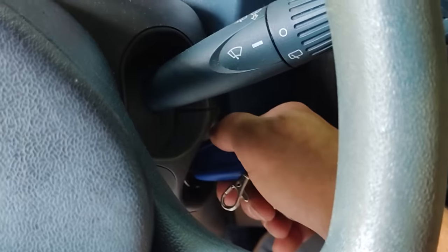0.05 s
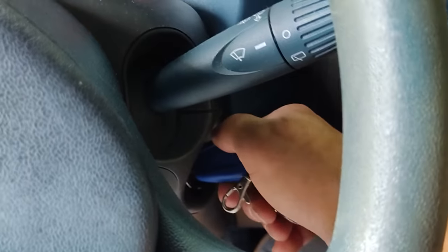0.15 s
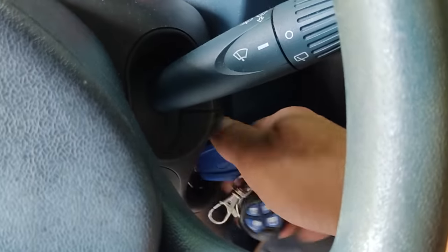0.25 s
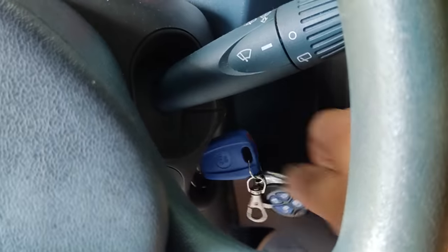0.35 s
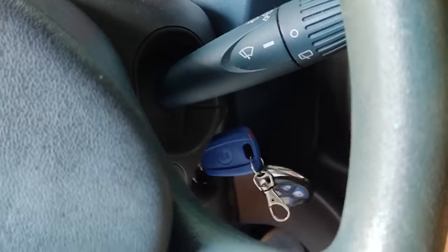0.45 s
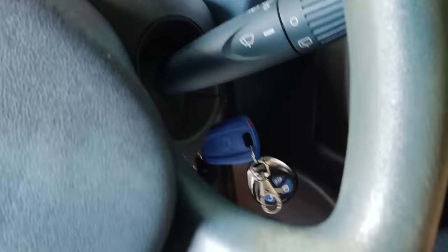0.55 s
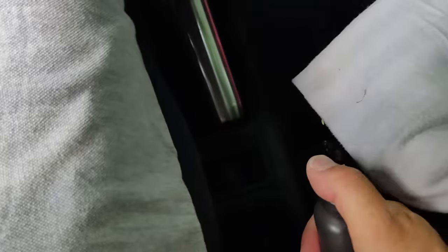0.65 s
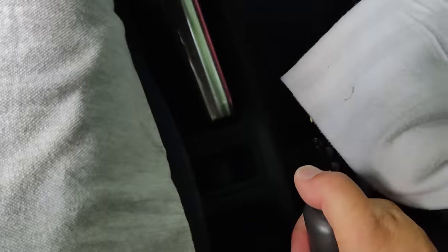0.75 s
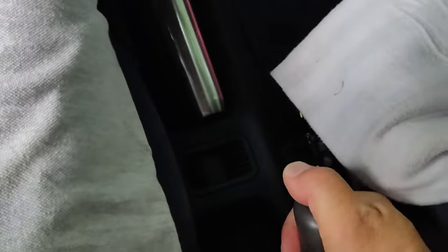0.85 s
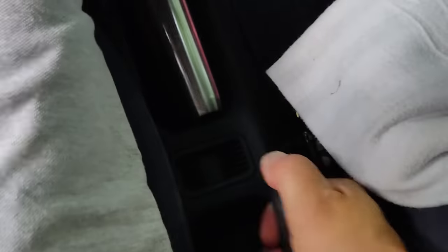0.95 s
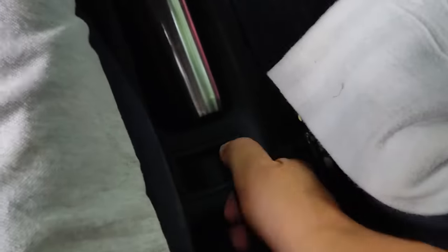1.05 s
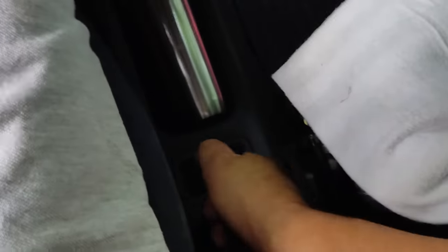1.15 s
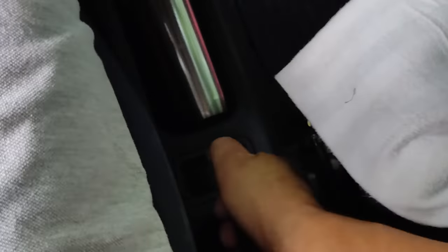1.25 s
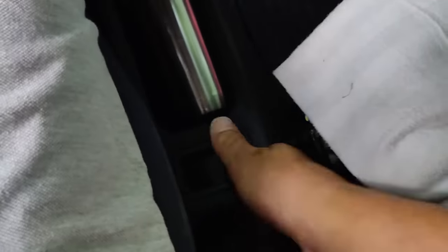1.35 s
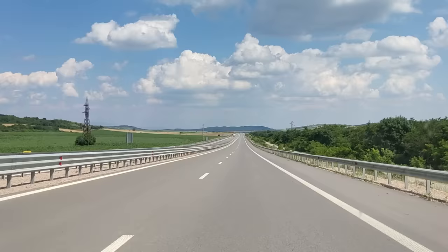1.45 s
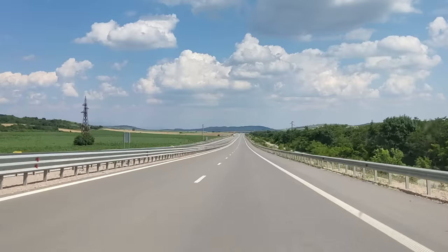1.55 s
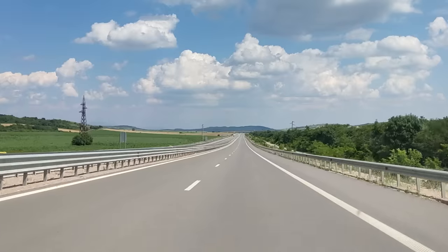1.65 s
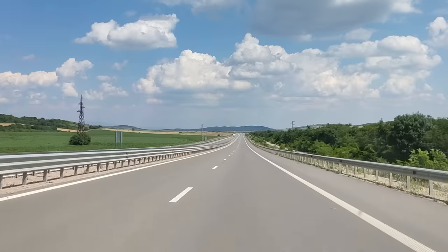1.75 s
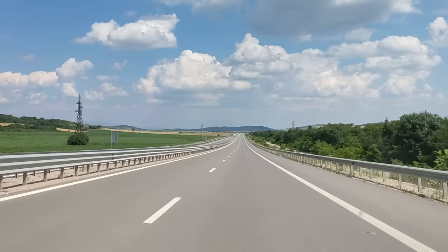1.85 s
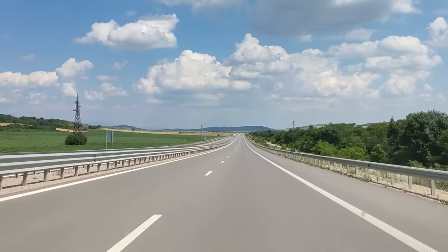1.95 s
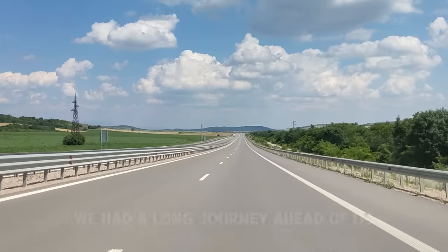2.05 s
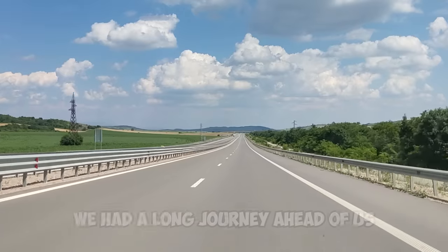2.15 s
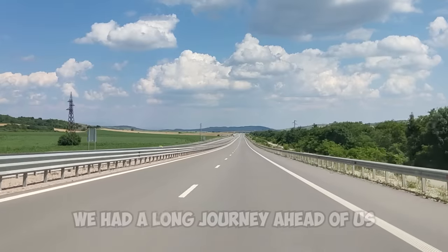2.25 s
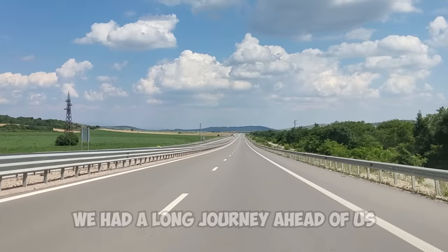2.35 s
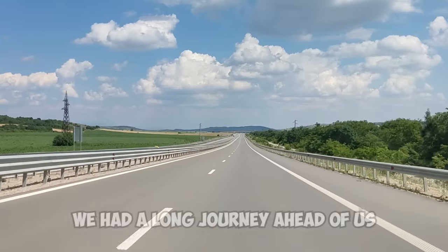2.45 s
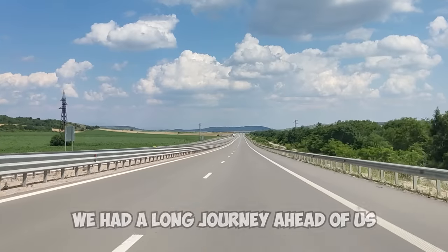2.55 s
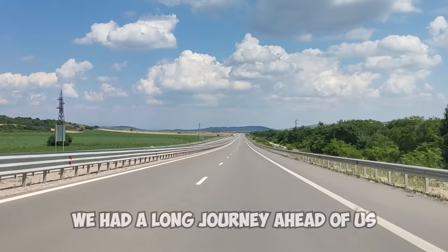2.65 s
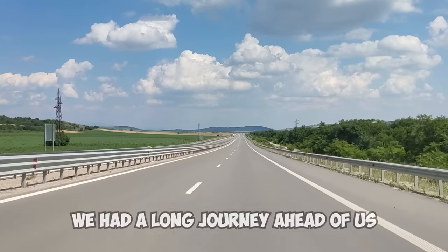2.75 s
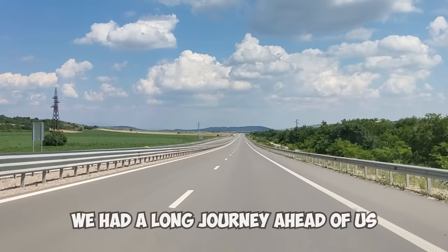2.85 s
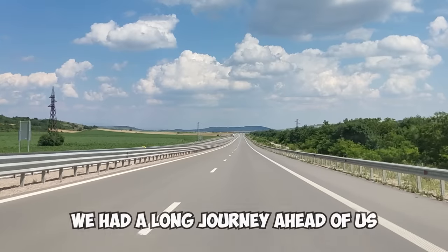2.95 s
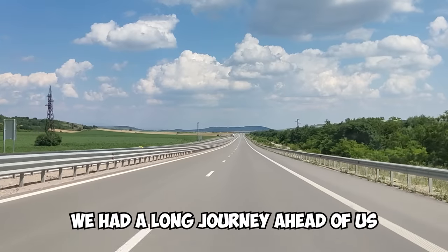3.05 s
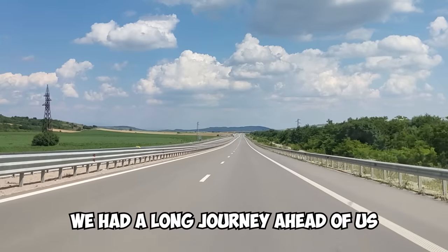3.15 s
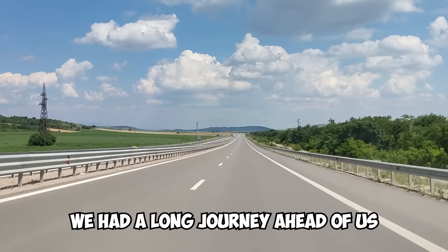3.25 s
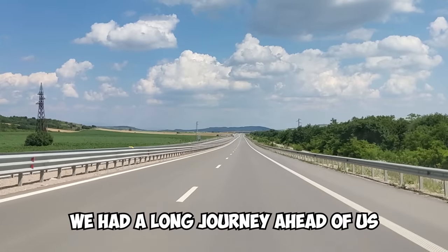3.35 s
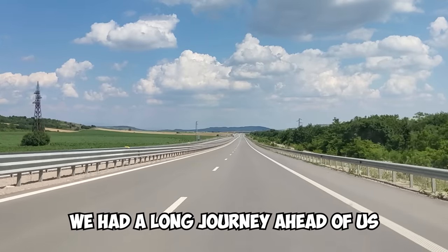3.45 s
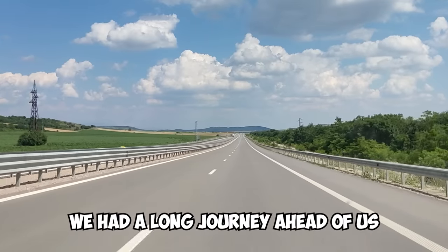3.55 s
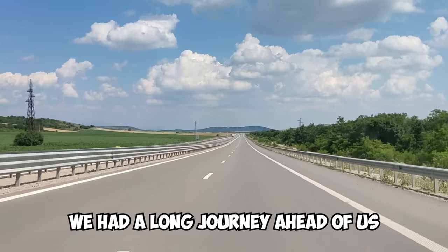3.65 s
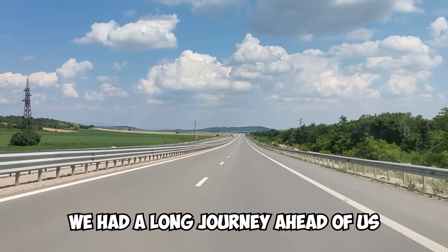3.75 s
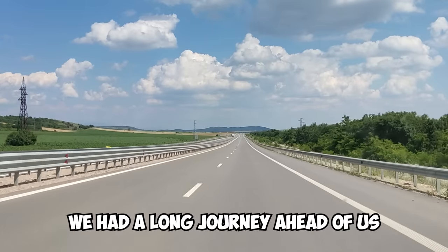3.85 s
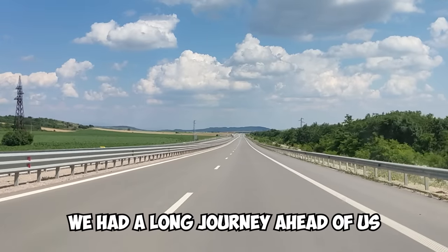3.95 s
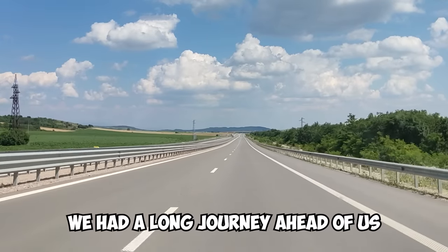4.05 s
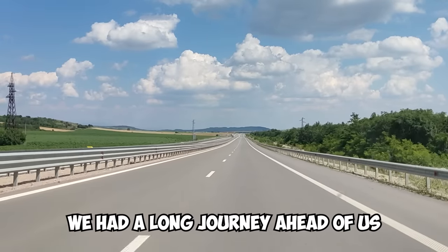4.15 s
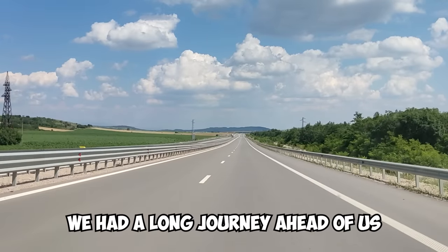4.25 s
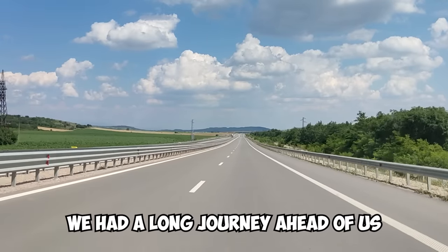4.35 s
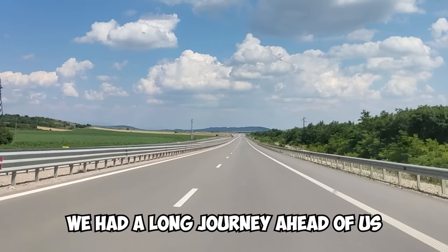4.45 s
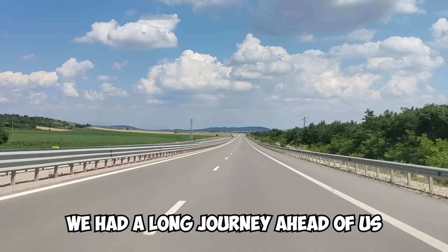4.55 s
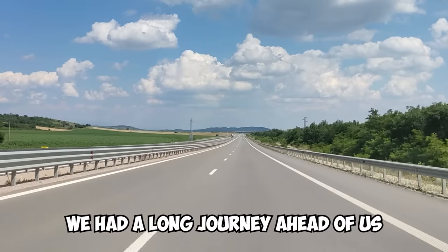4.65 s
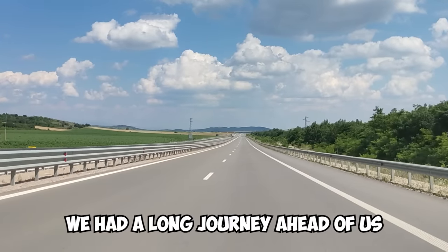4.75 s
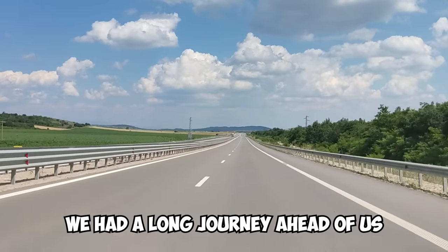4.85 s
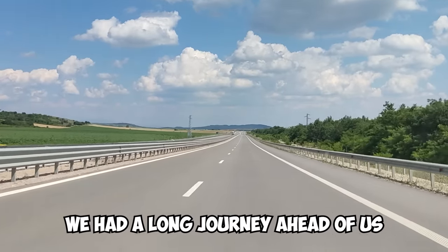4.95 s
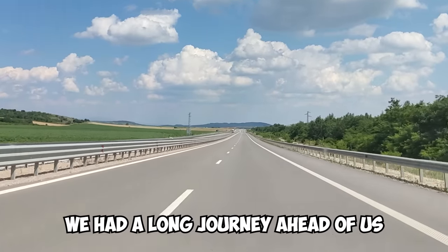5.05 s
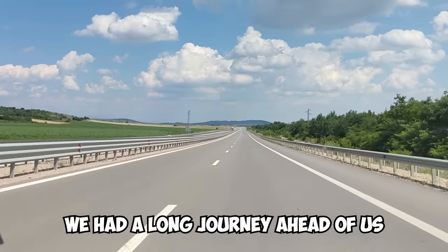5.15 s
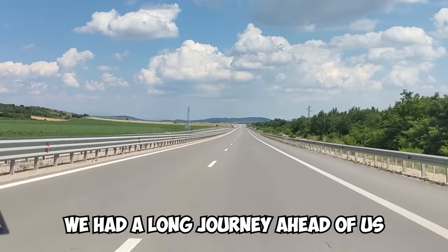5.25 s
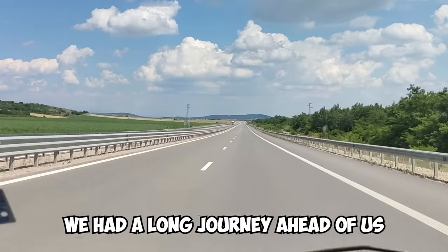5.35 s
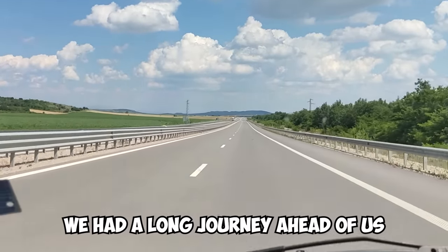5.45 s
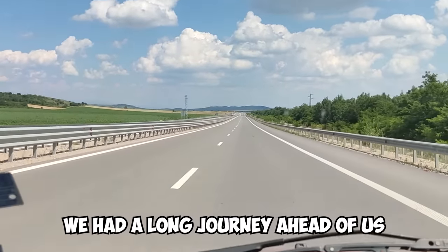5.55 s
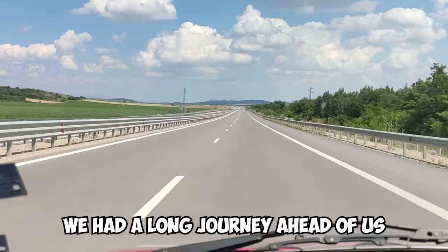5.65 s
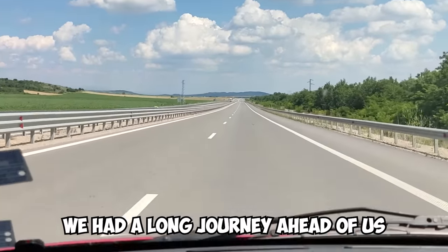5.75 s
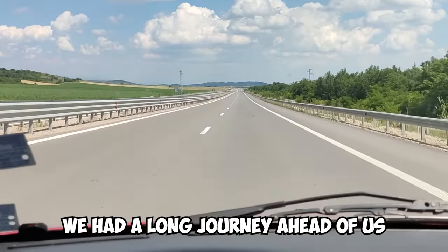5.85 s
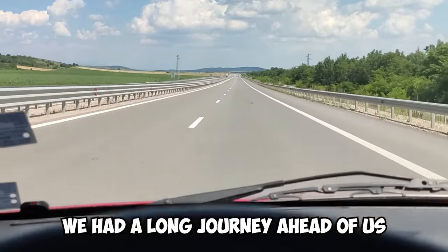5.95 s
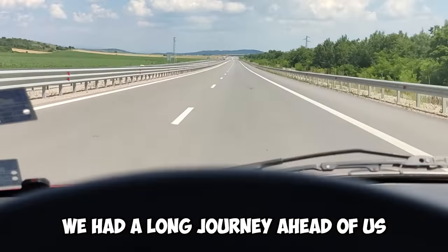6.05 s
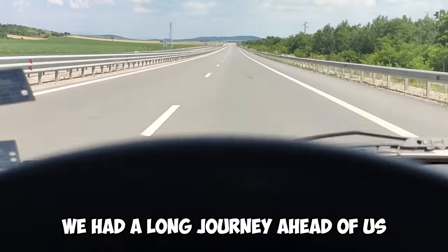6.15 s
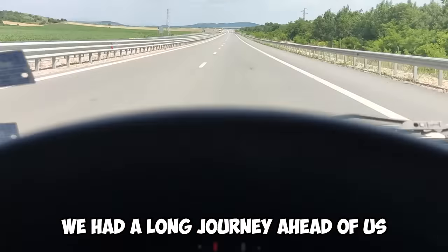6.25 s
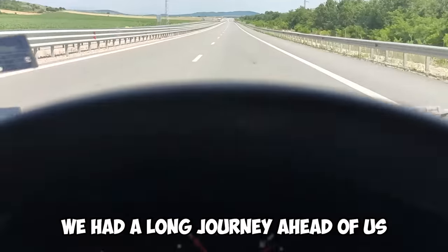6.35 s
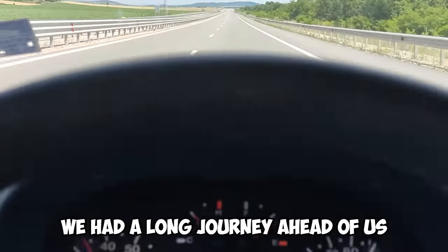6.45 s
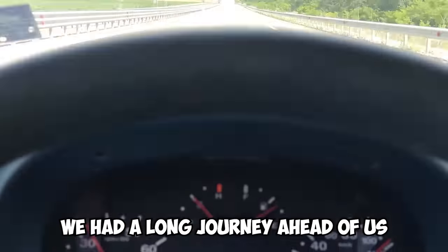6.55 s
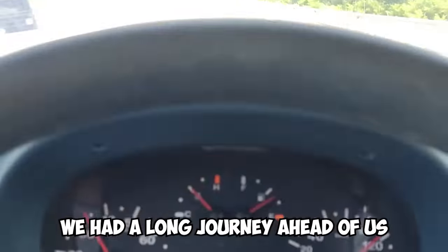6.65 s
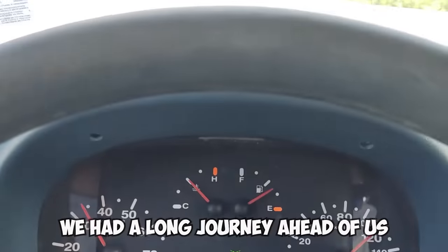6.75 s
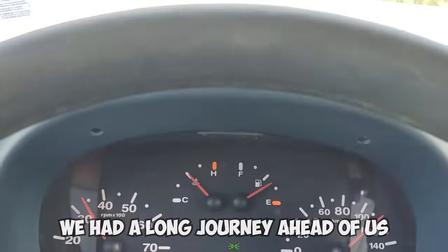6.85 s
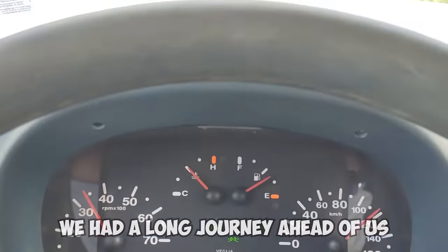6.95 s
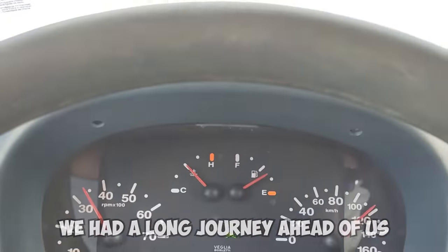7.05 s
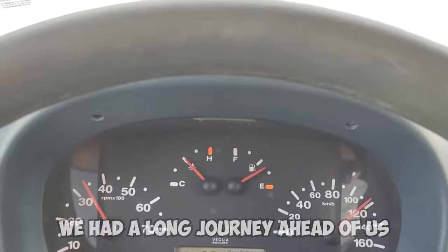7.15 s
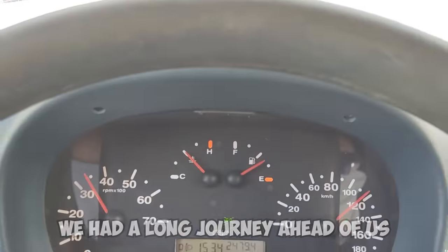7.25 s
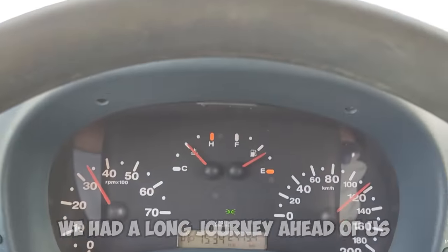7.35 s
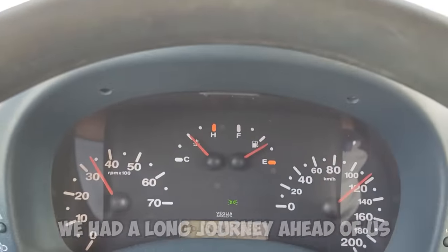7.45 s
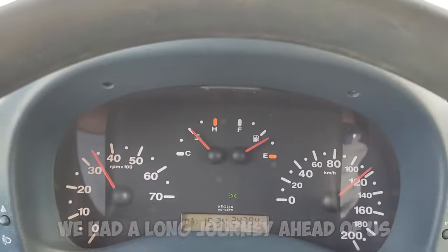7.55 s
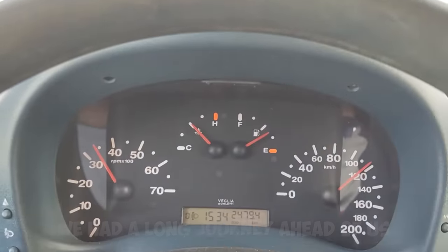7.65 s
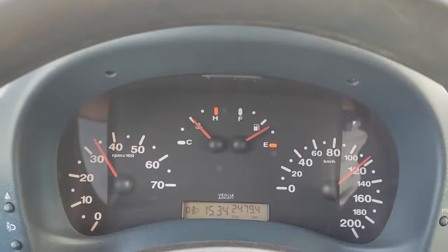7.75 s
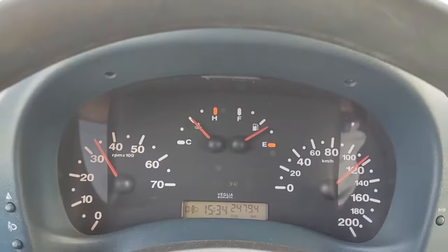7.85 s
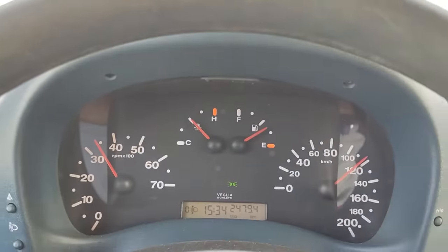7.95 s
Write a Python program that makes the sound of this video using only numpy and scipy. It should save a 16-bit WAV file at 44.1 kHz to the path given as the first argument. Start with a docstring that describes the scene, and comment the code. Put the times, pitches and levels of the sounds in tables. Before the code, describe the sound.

Car keys jingle in the ignition, a seat belt clicks shut over the idling engine, then steady motorway drone and tyre roar inside the cabin.

```python
"""A hand rumbles and rubs as it turns a small petrol car's ignition key; the key ring jingles in the
free vibration of struck steel. Next the engine idles, a periodic train of thumps and ticks, while a
seat-belt tongue latches and excites the modes of its hollow buckle. Then motorway cruising fades in:
the drone of the engine's orders, tyre roar transmitted through the body, and a thin whistle of
turbulent air at a seal."""
import sys
import numpy as np
from scipy import signal
from scipy.fft import rfft, irfft, next_fast_len
from scipy.io import wavfile

SR = 44100
rng = np.random.default_rng(int(sys.argv[2]) if len(sys.argv) > 2 else 0)


def put_to_file(sound):
    """Save the sound as 16-bit audio at rate SR, in the file named by the first command-line argument."""
    columns = np.atleast_2d(sound).T  # one column per channel
    safe = np.clip(columns, -1, 1)
    whole_steps = np.round(safe * 32767)
    wavfile.write(sys.argv[1], SR, whole_steps.astype(np.int16))


N = 352359
TIME = np.arange(N) / SR
RING_TIME = TIME[:SR // 3]  # time since a blow [s]
IDLE_START_S, CRUISE_START_S = 0.605, 1.501


def undb(db):
    """Amplitude ratio of a level in decibels."""
    return 10 ** (np.asarray(db) / 20)


def unit(x):
    """Normalisation to rms 1."""
    return x / np.sqrt(np.mean(x ** 2))


def curves(table):
    """Linear interpolation of each column over time."""
    times, *columns = np.transpose(table)
    return [np.interp(TIME, times, column) for column in columns]


def across(table, size, column=1):
    """Interpolation of one column over log frequency, on the bins of an FFT."""
    table = np.array(table)
    return np.interp(np.log(np.fft.rfftfreq(size, 1 / SR) + 1), np.log(table[:, 0]), table[:, column])


def walk(rate_hz):
    """Smooth random modulation with standard deviation near 1."""
    points = rng.standard_normal(int(TIME[-1] * rate_hz) + 2)
    return 1.2 * np.interp(TIME * rate_hz, np.arange(len(points)), points)


def attack(time_constant_s):
    """Exponential build-up after a blow."""
    return 1 - np.exp(-RING_TIME / time_constant_s)


def decay(t60):
    """Exponential damping: 60 dB in t60 seconds."""
    return np.exp(-np.log(1000) * RING_TIME / t60)


def ramp(start_s, length_s):
    """Linear rise from 0 to 1."""
    return np.clip((TIME - start_s) / length_s, 0, 1)


def swell(peak_s, rise_s, fall_s):
    """Exponential envelope of a movement: up 20 dB in rise_s, then down 20 dB in fall_s."""
    age = TIME - peak_s
    return undb(-20 * np.maximum(-age / rise_s, age / fall_s))


def movements(table):
    """Sum of the envelopes of several movements."""
    return sum(undb(db) * swell(s, rise_s, fall_s) for s, db, rise_s, fall_s in table)


def pan(db):
    """Channel gains for a level difference, left minus right."""
    return undb(np.array([[db], [-db]]) / 2)


def add(out, start_s, sound):
    """Superposition of a sound at a given time."""
    i = int(start_s * SR)
    out[:, i:i + sound.shape[1]] += sound


def ringing(modes, channels, detune, phase_scatter=1):
    """Free vibration: a sum of damped modes, randomly detuned at each blow."""
    out = 0
    for hz, db, t60 in modes:
        cycles = hz * (1 + detune * rng.standard_normal()) * RING_TIME
        offset = phase_scatter * rng.random((channels, 1))
        out = out + undb(db) * decay(t60) * np.sin(2 * np.pi * (cycles + offset))
    return out


# Likeness of left and right in the cabin: (frequency [Hz], correlation [-1 to 1])
CABIN_CORRELATION = [(60, 1), (180, 0.83), (235, 0.46), (300, 0.79), (400, 0.68), (630, 0.33), (820, 0.37),
                     (960, -0.22), (1450, -0.27), (2200, 0.077), (3200, -0.057), (6000, -0.026)]


def cabin_noise(spectrum, size=N):
    """Diffuse field of rms 1: long waves are correlated on the two sides, short waves are not."""
    padded = 2 * next_fast_len(size // 2 + 1)
    mid, side = rfft(rng.standard_normal((2, padded))) * undb(across(spectrum, padded))
    correlation = across(CABIN_CORRELATION, padded)
    mid, side = mid * np.sqrt(1 + correlation), side * np.sqrt(1 - correlation)
    return unit(irfft([mid + side, mid - side])[:, :size])


# Spectra of the hand's jolts and of its rubbing: (frequency [Hz], level [dB])
JOLT_SPECTRUM = [(7, 3), (13, 4.5), (25, 5), (45, -7), (70, -23), (120, -26.5), (250, -32.5), (500, -72)]
RUB_SPECTRUM = [(120, -25), (250, 2), (500, 3), (750, -8.5), (1900, -12), (3000, -21), (5500, -28),
                (14000, -46)]


def hand(grip_s=0.16, twist_s=0.26):
    """Structure-borne sound and friction: the hand jolts the microphone and rubs the steering column."""
    # each swells once, over the low level of a hand that only holds on
    jolt_gain = np.hypot(undb(-7.5) * swell(grip_s, rise_s=0.043, fall_s=0.74), undb(-22))
    holding = undb(-49) * ramp(-0.068, twist_s)
    rub_gain = np.hypot(undb(-35) * swell(twist_s, rise_s=0.096, fall_s=0.21), holding)
    # the biggest jolts of the handling rumble are softly limited
    jolts = .5 * np.tanh(2 * cabin_noise(JOLT_SPECTRUM) * jolt_gain)
    rubbing = cabin_noise(RUB_SPECTRUM) * unit(undb(2.0 * walk(68.4))) * rub_gain
    return jolts + rubbing


# Spectrum of hollow plastic housings: (frequency [Hz], level [dB])
HOUSING_SPECTRUM = [(100, 0.5), (280, -11.5), (420, -0.5), (820, -5.5), (1020, -8.5), (1400, -10.5),
                    (2200, -14), (4000, -19), (9000, -33)]


def clicks(table, spectrum, modes, ring_db, cabin_db, cabin_t60, knock_t60, chatter_db, attack_s):
    """Impact excitation: steel chatters and rings, its housing knocks, the cabin reverberates briefly."""
    out, size = np.zeros((2, N)), len(RING_TIME)
    for s, db, t60, knock_db, pan_db in table:
        chatter = unit(undb(chatter_db * np.repeat(rng.standard_normal(size), 24)[:size]))
        crack = cabin_noise(spectrum, size) * (chatter * decay(t60) + undb(cabin_db) * decay(cabin_t60))
        steel = crack + undb(ring_db) * ringing(modes, channels=2, detune=0.006)
        # the housing is close by, so its knock is nearly the same on both sides
        knock = cabin_noise(HOUSING_SPECTRUM, size)
        knock = unit(knock + knock.sum(axis=0)) * decay(knock_t60)
        impact = steel * pan(pan_db) + undb(knock_db) * knock * pan(pan_db / 2)
        add(out, s, undb(db) * attack(attack_s) * impact)
    return out


# Scrapes in the lock and swings of the key ring: (peak time [s], level [dB], rise [s], fall [s])
LOCK_SCRAPES = [(.062, -43, 0.016, 0.055), (.185, -47, 0.028, .04)]
RING_SWINGS = [(.064, -58, .02, 0.083), (.172, -45.5, 0.053, .03), (.226, -49, .015, .07),
               (.266, -38, 0.045, 0.089), (.355, -48, .02, 0.064), (.484, -45.5, .012, 0.055)]
# Key and lock impacts: (time [s], level [dB], t60 [s], relative knock [dB], left minus right [dB])
KEY_IMPACTS = [(.1825, -34, 0.062, -18, -5), (.226, -42, 0.035, 2, -1.5), (.249, -49, 0.035, 10.5, -3),
               (.2865, -19.5, 0.02, -21, -4), (.289, -17.5, 0.018, -23.5, -10), (.296, -32, 0.049, -15, 2),
               (.304, -29, 0.04, -9, -2), (.3377, -31, 0.016, -11.5, -1), (.352, -41, .03, -3, -7),
               (.4735, -44, 0.085, -5.5, -4), (.486, -44.5, .06, -4, -1), (.519, -54, .02, -7, -8)]
# Spectrum of the struck keys: (frequency [Hz], level [dB])
KEY_SPECTRUM = [(300, -33.5), (1000, -18), (2000, -8), (3000, -7), (3500, -8), (4300, -2), (5800, -4),
                (7200, -1.5), (8200, 0), (9500, 1.5), (11000, 1.5), (12000, 2), (14000, -5)]
# Modes of the keys: (frequency [Hz], level [dB], t60 [s])
KEY_STEEL_MODES = [(2850, -12, 0.066), (4070, -12, 0.086), (4700, -15, 0.06), (5080, -13, 0.05),
                   (8200, -3.5, 0.045), (8900, 0.5, 0.052), (9000, -13, 0.062), (9800, 0, 0.052),
                   (10600, 5.5, 0.053), (11040, 4, 0.057), (11800, 0, .05), (12800, -5, .06)]


def ignition_key(rest_jingle_db=-63, grain_db=2.5):
    """Friction and impact: the key scrapes and clicks in the lock while its ring swings and jingles."""
    scrape = cabin_noise(HOUSING_SPECTRUM) * movements(LOCK_SCRAPES)
    jingle_gain = np.hypot(movements(RING_SWINGS), undb(rest_jingle_db))
    jingle = cabin_noise(KEY_SPECTRUM) * unit(undb(grain_db * walk(500))) * jingle_gain
    lock = clicks(KEY_IMPACTS, KEY_SPECTRUM, KEY_STEEL_MODES, ring_db=-5.5, cabin_db=-15,
                  cabin_t60=0.15, knock_t60=0.16, chatter_db=1.0, attack_s=0.00047)
    return scrape + jingle + lock


# Blows on the column trim and the seat: (time [s], level [dB], t60 [s])
SOFT_BLOWS = [(0.145, -31, 0.11), (0.242, -20, 0.15), (0.26, -18, .1), (0.289, -24, 0.092),
              (.362, -26, .08), (0.405, -27, 0.097), (0.478, -30, 0.079), (0.524, -24.5, 0.08),
              (1.182, -27, 0.19), (1.442, -22, 0.18)]
# Spectrum of struck padding: (frequency [Hz], level [dB])
PADDING_SPECTRUM = [(40, 5.5), (120, -5), (260, -7), (500, -25), (1000, -32), (3000, -56)]


def bumps(thud_hz=36, thud_db=4, thud_t60=0.22):
    """Cushioned impact: the hand's blows on padding carry little treble; the mass beneath thuds."""
    out = np.zeros((2, N))
    onset = attack(0.0012) ** 2
    thud = undb(thud_db) * np.sin(2 * np.pi * thud_hz * RING_TIME) * decay(thud_t60)
    for s, db, t60 in SOFT_BLOWS:
        padding = cabin_noise(PADDING_SPECTRUM, len(RING_TIME)) * decay(t60)
        add(out, s, undb(db) * onset * (padding + thud))
    return out


def dry_click(level_db=-15, t60=0.057):
    """Signal discontinuity: a dry click at the cut, where the key scene ends and the idle begins."""
    out = np.zeros((2, N))
    add(out, IDLE_START_S, undb(level_db) * decay(t60)[None])
    return out


# Spectra of the engine block and its tick in the cabin: (frequency [Hz], level [dB])
BLOCK_SPECTRUM = [(70, 0.5), (135, 4), (200, -3.5), (350, 0), (550, -1), (690, -8), (820, -19.5),
                  (1600, -19.5), (3000, -29), (6000, -36), (9000, -36), (14000, -37)]
TICK_SPECTRUM = [(1000, -9), (1500, -5), (2000, -9), (2600, -8), (4000, -7), (5000, -13), (14000, -28)]
# Modes of the ticking part: (frequency [Hz], level [dB], t60 [s])
TICKER_MODES = [(1490, -11, .1), (1880, 0, .2), (2460, -11, .1), (3620, -14, .1)]


def idle(turn_hz=26.85, first_tick_s=0.6365, boom_db=-26, block_db=-42, growth_db_per_s=1.5):
    """Periodic forcing: four cylinders fire twice a turn and boom; each turn thumps and ticks once."""
    turns = (TIME - first_tick_s) * turn_hz
    shake = undb(-7) * np.sin(2 * np.pi * turns)
    boom = -np.sqrt(2) * (np.cos(4 * np.pi * turns) + shake)
    impulses = np.diff(np.floor(turns), prepend=np.floor(turns[0]))

    def every_turn(blow, attack_s, t60, uneven_db):
        """Convolution of one damped blow with an impulse each turn."""
        force = impulses * undb(uneven_db * walk(turn_hz))
        response = blow * attack(attack_s) * decay(t60)
        return unit(signal.oaconvolve(force[None], response, axes=1)[:, :N])

    block_blow = cabin_noise(BLOCK_SPECTRUM, len(RING_TIME))
    thump = every_turn(block_blow, attack_s=0.0032, t60=0.39, uneven_db=2.0)
    # one small part ticks behind the bulkhead, always with the same ring
    ring = undb(9) * ringing(TICKER_MODES, channels=1, detune=0)
    tick_blow = cabin_noise(TICK_SPECTRUM, len(RING_TIME)) + ring
    tick = every_turn(tick_blow, attack_s=0.0019, t60=0.037, uneven_db=0)
    block = undb(-2) * (thump + cabin_noise(BLOCK_SPECTRUM)) + undb(-15) * tick
    # the level grows slowly as the microphone moves, and dips briefly once
    growth_db = growth_db_per_s * (np.minimum(TIME, CRUISE_START_S) - IDLE_START_S)
    dip_db = -8 * np.exp(-((TIME - 0.786) / 0.041) ** 2)
    return (boom * undb(boom_db) + block * undb(block_db)) * undb(growth_db + dip_db)


# Tongue and buckle impacts: (time [s], level [dB], t60 [s], relative knock [dB], left minus right [dB])
TONGUE_IMPACTS = [(.667, -51, 0.016, 8, -14), (.7395, -27, 0.035, -4, 9), (.7433, -12.5, 0.02, -15, 10),
                  (.749, -23.5, 0.042, -7.5, 15), (1.134, -30.5, 0.016, -7.5, -8),
                  (1.1775, -20.5, 0.0089, -2.5, -13), (1.186, -26, 0.097, 4.5, -9),
                  (1.207, -31, .02, 5, -9), (1.2125, -23, 0.018, -5, -7), (1.3885, -17.5, 0.019, -27, -11),
                  (1.3912, -24, 0.014, -16, 11), (1.4388, -26.5, 0.019, -0.5, -9)]
# Spectrum of the struck tongue: (frequency [Hz], level [dB])
TONGUE_SPECTRUM = [(300, -35), (1000, -32), (2500, -8), (3600, -6.5), (4400, -7), (5400, -4.5), (7000, 3),
                   (8000, 3.5), (9000, 0), (11000, 5.5), (14000, -4)]
# Modes of the tongue: (frequency [Hz], level [dB], t60 [s])
TONGUE_STEEL_MODES = [(4400, -9, .04), (6826, -10, 0.055), (7100, -11, .055), (7950, -6, 0.035),
                      (8672, -10, 0.037), (9920, 0, 0.035), (10620, -7, 0.05), (10900, -9, 0.065),
                      (11470, -4, 0.037)]


def belt_tongue():
    """Plate vibration: the steel tongue rings as it taps the buckle, goes in and is tugged."""
    return clicks(TONGUE_IMPACTS, TONGUE_SPECTRUM, TONGUE_STEEL_MODES, ring_db=-11, cabin_db=-10,
                  cabin_t60=0.077, knock_t60=0.084, chatter_db=4.0, attack_s=0.00064)


# Pulls of the webbing: (peak time [s], level [dB], rise [s], fall [s])
WEBBING_PULLS = [(1.1, -58, 0.31, 0.28), (1.336, -59, 0.012, 0.2)]
# Spectrum of the sliding weave: (frequency [Hz], level [dB])
WEBBING_SPECTRUM = [(2000, -28), (6000, -9), (8200, -4), (11000, -8), (14000, -16)]


def belt_webbing(grain_db=2.3):
    """Sliding friction: the webbing hisses through its guide, loudest where it runs fastest."""
    return cabin_noise(WEBBING_SPECTRUM) * movements(WEBBING_PULLS) * undb(grain_db * walk(79.8))


# Blows of the latch: (time [s], shell level [dB], catch level [dB], hardness [dB per octave])
LATCH_BLOWS = [(1.178, -17.5, -27, 1), (1.1847, -18.5, -11.5, -5), (1.2114, -20, -17, -6)]
# Modes of the buckle's hollow shell and sprung catch: (frequency [Hz], level [dB], t60 [s])
BUCKLE_SHELL_MODES = [(106, -10.5, .1), (270, -7, 0.076), (387, -5, 0.051), (436, -5, 0.1),
                      (517, 0.5, 0.065), (576, -5.5, 0.074), (1005, -7.5, 0.045), (1414, -16, 0.05),
                      (2190, -11, 0.055), (2600, -15, .025), (2750, -17, 0.045)]
BUCKLE_CATCH_MODES = [(706, -9, 0.053), (743, -2.5, 0.055), (781, -3.5, 0.056), (802, -3, 0.048)]


def buckle_latch(tilt_above_hz=455, pan_db=-3):
    """Modal resonance: the latch springs home; a harder blow brings out the shell's upper modes."""
    out = np.zeros((2, N))
    for s, shell_db, catch_db, tilt_db in LATCH_BLOWS:
        struck = [(hz, db + tilt_db * np.log2(max(hz / tilt_above_hz, 1)), t60)
                  for hz, db, t60 in BUCKLE_SHELL_MODES]
        shell = ringing(struck, channels=1, detune=0.003) * attack(0.001)
        catch = ringing(BUCKLE_CATCH_MODES, channels=1, detune=0.0037, phase_scatter=0) * attack(0.0027)
        add(out, s, (undb(shell_db) * shell + undb(catch_db) * catch) * pan(pan_db))
    return out


# Engine speed when cruising: (time [s], firing rate [Hz])
FIRING_RATE = [(1.7, 110.6), (4.69, 112.2), (7.98, 112.4)]
# Weaker orders: (multiple of the firing rate [ratio], relative level [dB])
ENGINE_ORDERS = [(.5, -18), (1.4, -14), (1.5, -20), (2, -21), (2.25, -22), (2.5, -20), (2.75, -19.5),
                 (3.1, -23), (3.25, -28), (4, -28), (4.75, -30), (5, -31), (7.5, -37)]


def cruising_engine(drone_db=-35, waver_db=1.82, jitter_cycles=0.047, lead_cycles=0.05):
    """Engine orders: the firing tone and weaker, wavering ones from unequal cylinders and drivetrain."""
    firings = np.cumsum(curves(FIRING_RATE)[0]) / SR
    # the cabin's standing wave reaches the right side a little earlier
    lead = np.array([[0], [lead_cycles]])
    out = undb(waver_db * walk(16)) * np.sin(2 * np.pi * (firings + jitter_cycles * walk(16) + lead))
    for order, db in ENGINE_ORDERS:
        gain = undb(db + 2 * walk(4))
        out += gain * np.sin(2 * np.pi * (order * firings + 0.18 * walk(6)))
    return np.sqrt(2) * out * undb(drone_db)


# Spectra of road roar and tyre boom in the cabin: (frequency [Hz], level [dB])
ROAR_SPECTRUM = [(6, -4), (13, 7.5), (30, 2.5), (50, 3.5), (75, -3.5), (125, -3), (160, -10), (225, -6),
                 (262, -16.5), (310, -12.5), (385, -14.5), (480, -21.5), (590, -17.5), (690, -24),
                 (810, -21.5), (1050, -21.5), (1250, -26.5), (2000, -28.5), (3000, -36.5), (4000, -35.5),
                 (5500, -42), (14000, -40)]
BOOM_SPECTRUM = [(70, -20), (125, -12.5), (158, 3), (205, -5.5), (260, -11.5), (380, -13), (600, -34),
                 (2000, -46)]
# Tyre boom, following the roughness of the road: (time [s], level [dB])
BOOM_LEVEL = [(1.6, -40), (1.82, -38.5), (2.15, -43.5), (2.6, -40), (4.45, -41), (4.7, -47.5), (6.4, -45),
              (7.3, -50.5), (7.95, -41)]


def tyres(roar_db=-36, gust_db=1.35, asphalt_grain_db=0.74, patch_db=1.0):
    """Roughness excitation: the tyres roar through the body, more in gusts, and boom on rough ground."""
    roar = cabin_noise(ROAR_SPECTRUM) * undb(roar_db + gust_db * gust() + asphalt_grain_db * walk(25))
    boom = cabin_noise(BOOM_SPECTRUM) * undb(curves(BOOM_LEVEL)[0] + patch_db * walk(12))
    return roar + boom


# Lower band of the whistle through the gusts: (time [s], frequency [Hz], level [dB])
SEAL_TONE = [(1.9, 12050, -68), (3.15, 11770, -69), (3.45, 12500, -57), (3.85, 12700, -55),
             (4.3, 12000, -62), (4.68, 12200, -66), (4.85, 12300, -62), (5.15, 12400, -61),
             (5.6, 11850, -65), (5.92, 12200, -61), (6.3, 12200, -62), (6.7, 12100, -59.5),
             (7.08, 12500, -61), (7.22, 12100, -64), (7.48, 11940, -68), (7.65, 12100, -65)]


def seal_whistle(width_hz=360, waver_hz=70, upper_ratio=1.16, upper_db=-73, flutter_db=2.5, pan_db=6):
    """Flow-induced tone: turbulent air at a seal sings in two narrow bands that rise in a gust."""
    hz, lower_db = curves(SEAL_TONE)
    cycles = np.cumsum(hz + waver_hz * walk(22)) / SR
    out = 0
    for ratio, db in ((1, lower_db), (upper_ratio, upper_db)):
        turbulence = np.array([walk(width_hz) + 1j * walk(width_hz) for _ in range(2)])
        out = out + undb(db) * np.real(turbulence * np.exp(2j * np.pi * ratio * cycles))
    return out * undb(flutter_db * walk(35)) * pan(pan_db)


def gust():
    """Wind strength, 0 to 1, from the whistle: the pitch of a flow tone rises with air speed."""
    hz = curves(SEAL_TONE)[0]
    return (hz - hz.min()) / np.ptp(hz)


def scene(cruise_fade_s=0.2):
    """Superposition of the sources in three successive scenes: key, belt at idle, cruising."""
    idle_gate, parked_gate = ramp(IDLE_START_S, .004), 1 - ramp(CRUISE_START_S, .002)
    cruising = (cruising_engine() + tyres() + seal_whistle()) * ramp(CRUISE_START_S, cruise_fade_s)
    turning_key = (hand() + ignition_key()) * (1 - idle_gate)
    buckling = (idle() + belt_tongue() + buckle_latch() + belt_webbing()) * idle_gate
    return (turning_key + bumps() + dry_click() + buckling) * parked_gate + cruising


# Response of the microphone ports: (frequency [Hz], left gain [dB], right gain [dB])
PORT_RESPONSE = [(1500, 2.5, 2.5), (2300, 2.5, 2), (4200, 1.5, 3), (5860, 2, 2.5), (7030, 2.5, 4.5),
                 (8520, 5, 9.5), (9500, 5.5, 3.5), (10320, 8, -8), (11200, 1.5, -7), (13500, -2.5, -11),
                 (13900, 1, -8.5)]


def port_resonance(x, column):
    """Treble resonance of one port, as a minimum-phase filter built from the folded cepstrum."""
    size = 2 * next_fast_len(len(x) // 2 + 2048)
    cepstrum = irfft(np.log(undb(across(PORT_RESPONSE, size, column))))
    cepstrum[1:size // 2] *= 2
    cepstrum[size // 2 + 1:] = 0
    return irfft(rfft(x, size) * np.exp(rfft(cepstrum)))[:len(x)]


def record(dry, top_hz=14200, ceiling=0.9):
    """Transduction: each microphone port resonates, peaks saturate and a low-pass removes the top."""
    ported = np.array([port_resonance(dry[0], column=1), port_resonance(dry[1], column=2)])
    low_pass = signal.ellip(10, .2, 80, top_hz, fs=SR, output="sos")
    return signal.sosfilt(low_pass, np.clip(ported, -ceiling, ceiling))


dry = scene()
out = record(dry)
put_to_file(out)
```